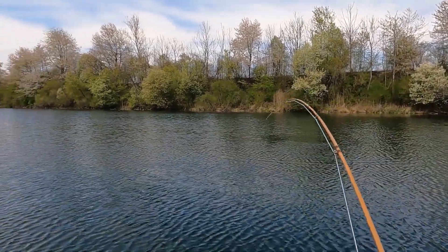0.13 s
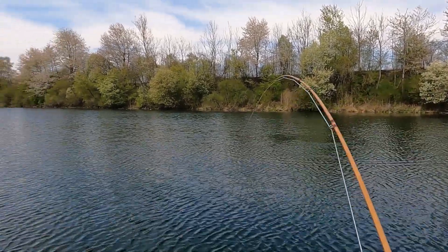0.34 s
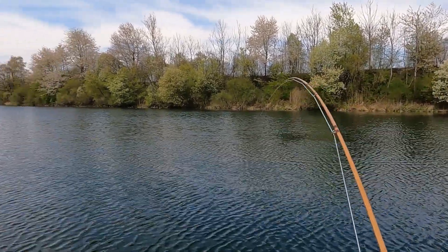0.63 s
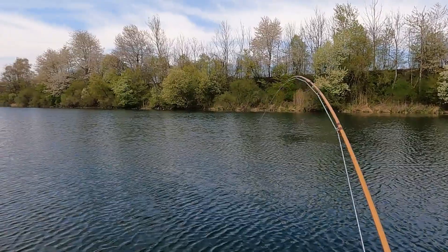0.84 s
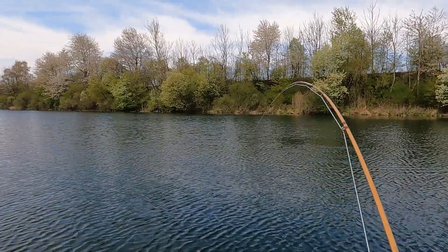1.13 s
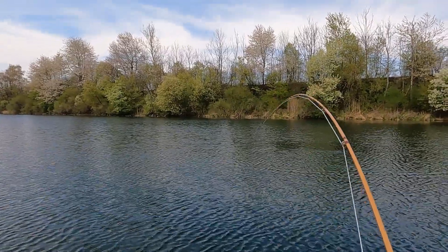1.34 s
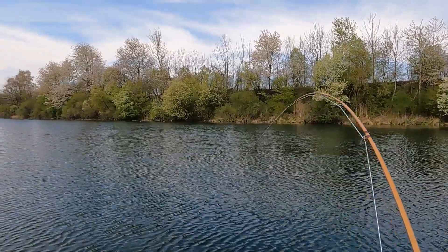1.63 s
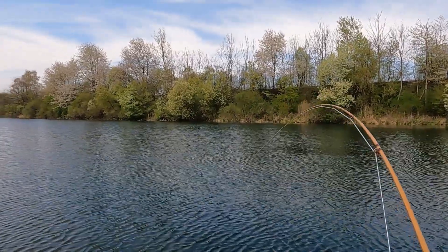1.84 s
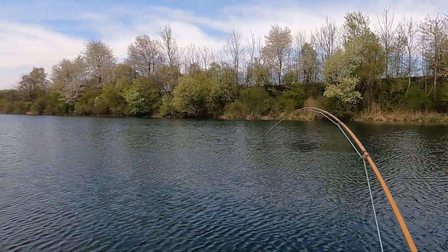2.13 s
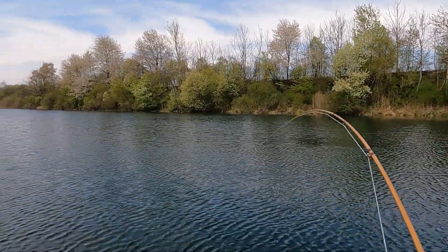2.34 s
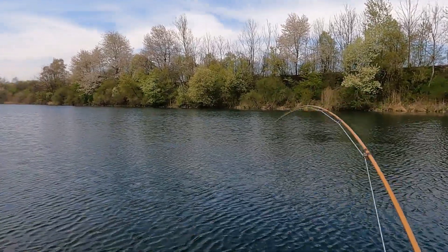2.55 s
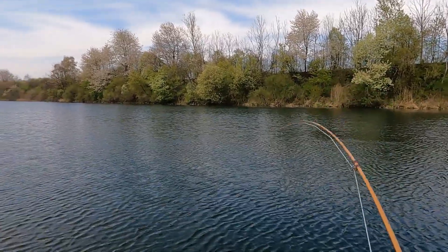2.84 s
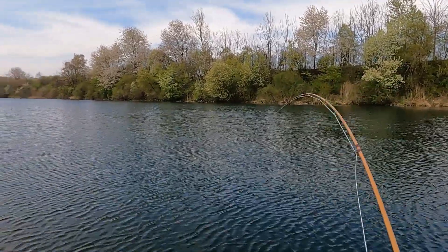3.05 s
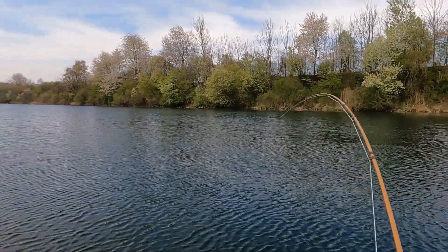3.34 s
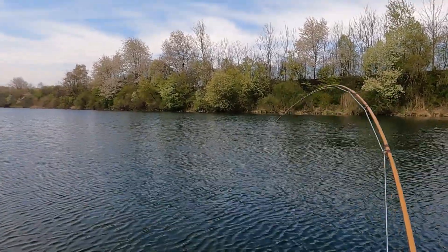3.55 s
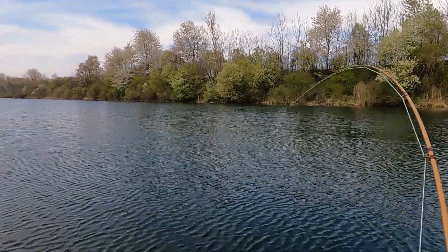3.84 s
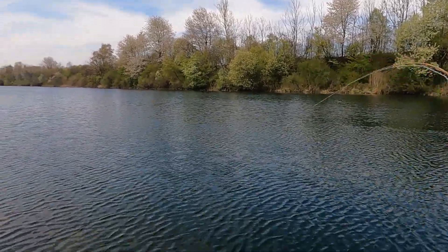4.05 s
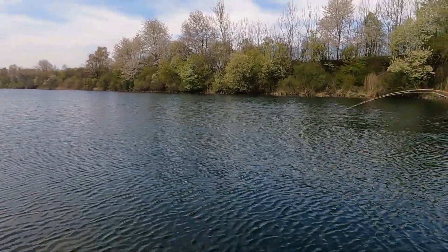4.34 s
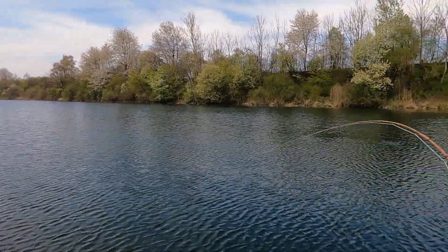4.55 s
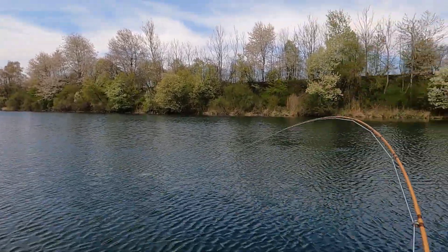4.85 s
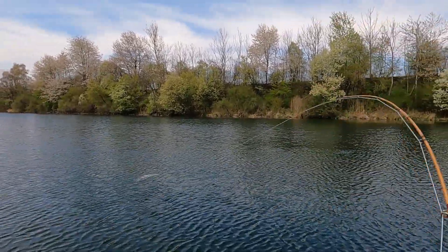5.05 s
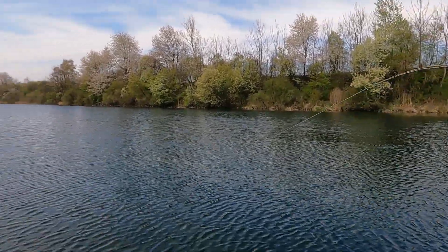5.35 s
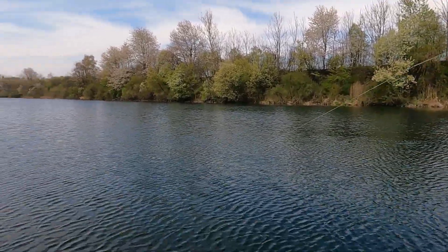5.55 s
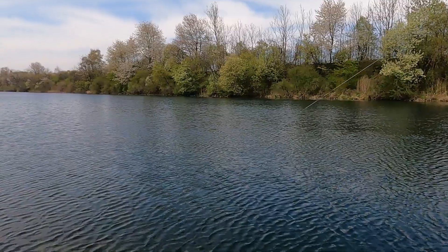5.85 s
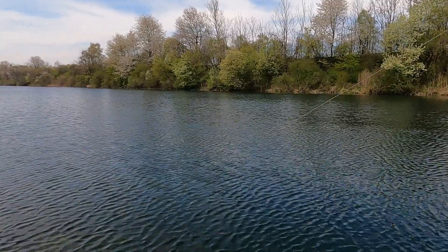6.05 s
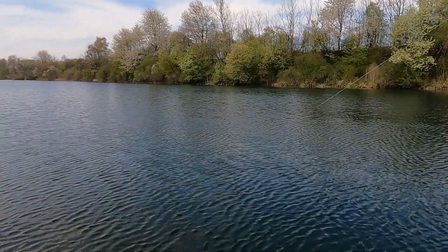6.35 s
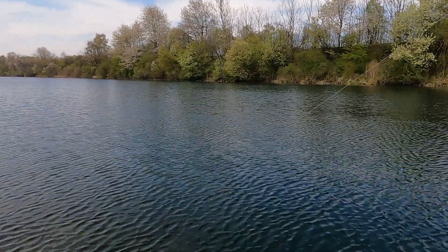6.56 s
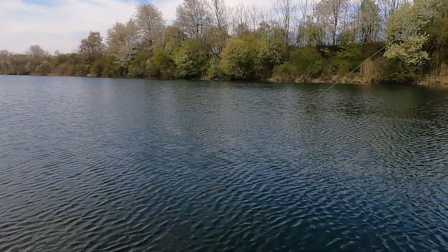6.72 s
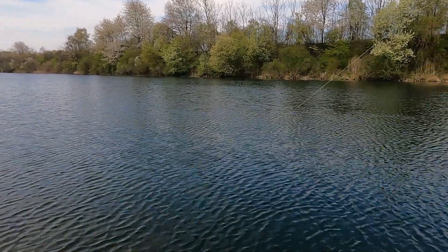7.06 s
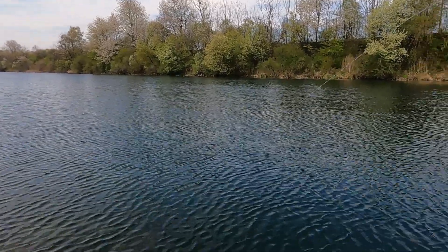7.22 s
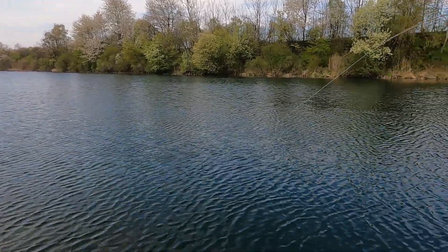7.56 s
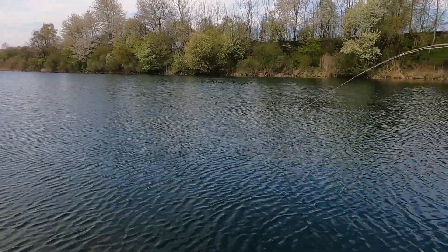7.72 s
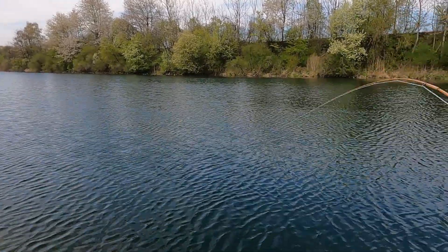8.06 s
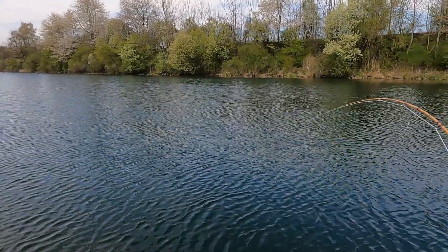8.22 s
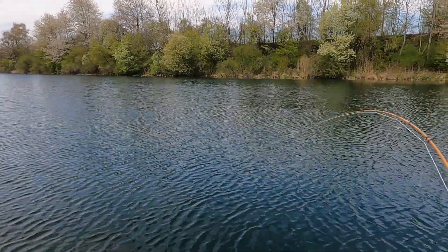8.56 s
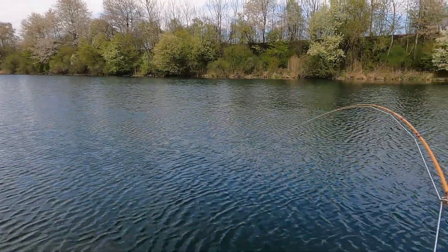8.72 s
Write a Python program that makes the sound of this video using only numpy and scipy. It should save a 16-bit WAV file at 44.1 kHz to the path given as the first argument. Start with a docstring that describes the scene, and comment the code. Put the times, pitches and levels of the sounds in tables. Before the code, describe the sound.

A close fly reel buzzes in two surging ratcheting runs, each followed by single clicks, with light wind rumbling on the microphone.

```python
"""A click-and-pawl fly reel buzzes close to the microphone: a fish is being played from a lake bank.
Its tugs spin the spool in two surging runs, each followed by single teeth. At every tooth the pawl
snaps and the metal frame rings; in the runs the colour cycles with each turn of the spool.
Light wind rumbles on the microphone and the open air murmurs far behind. A sleeve rustles as the rod
swings, and the line ticks on the rod and swishes through its rings."""
import sys
import numpy as np
from scipy import signal
from scipy.fft import rfft, irfft, next_fast_len
from scipy.io import wavfile
from scipy.ndimage import uniform_filter1d

SR = 44100
rng = np.random.default_rng(int(sys.argv[2]) if len(sys.argv) > 2 else 0)


def unload_audio(sound):
    """Save the sound as a 16-bit wav file, at the path given as the first command line argument."""
    columns = np.transpose(np.atleast_2d(sound))
    # keep every value between -1 and 1, then stretch to whole-number steps
    steps = np.round(np.clip(columns, -1, 1) * 32767)
    wavfile.write(sys.argv[1], SR, steps.astype(np.int16))


N = 392033
TIME = np.arange(N) / SR

# The pawl's dry snap, which changes with load and grip.
# Each row: frequency in Hz, then gain in dB for the first run, the second run and single teeth.
SNAP_SPECTRA = [(700.0, 4.5, 14.5, 6), (1455, 4, -4.5, 8.5), (2034, 33, 35.5, 33.5), (2733, 23, 26.5, 13),
                (3450, 34, 36, 20), (4190, 21, 15, 18.5), (5250, 22.5, 26, 11), (5910, 21.5, 22, 25.5),
                (8400, 17, 15.5, 20.5), (9100, 23, 17.5, 22.5), (9600, 14.5, 13.5, 18.5),
                (12320, 10.5, 14, 17), (13930, -0.5, 0, 1.5), (16000.0, -16, -20, -23)]
# Modes of frame and spool. Each row: frequency in Hz, seconds to fall 60 dB,
# then gain in dB for the first run, the second run and single teeth.
FRAME_MODES = [(1060, 0.015, -23.5, -13, -16), (1357, 0.017, -20.5, -38, -19), (2027, 0.012, 1, 3, -12),
               (2205, 0.0057, -32, -3.5, -25), (2580, 0.039, -14, -12.5, -14),
               (2644, 0.0041, 0.5, 4.5, -18.5), (2940, 0.014, -38, -32, -6.5),
               (3233, 0.054, -24, -13.5, -24.5), (3387, 0.034, -1, -43, -7.5), (3439, 0.022, 2.5, 6, 0.5),
               (3607, 0.053, -13.5, -10.5, -12), (3676, 0.012, -2, -27, 0), (3837, 0.016, -22.5, -6, -18),
               (4300, 0.025, -15.5, -10.5, -11.5), (4640, 0.067, -20.5, -15, -26.5),
               (4975, 0.014, -4.2, 1, -7), (5260, 0.0096, -5.5, -9, -18), (6530, 0.012, -50.5, -16, -20),
               (7580, 0.006, -31, 0, -21), (9020, 0.0076, -12, -24, -12.5), (11270, 0.017, -19, -11.5, -11),
               (12070, 0.014, -21, -15, -21), (12240, 0.02, -20.5, -21, -29)]
# The click's knock, bite, sheen and whine. Each row: low and high edge in Hz, once-a-turn swing in dB,
# its strongest tooth, twice-a-turn swing in dB, its strongest tooth, dB per doubling of speed.
CLICK_BANDS = [(1600, 2540, 1.5, 17, 3, 13.9, -1.5), (4620, 7350, 1.2, 32.6, 2.5, 5.8, 0),
               (8400, 12800, 2, 16.0, -0.2, 5.5, -2.4), (3120, 3750, 1.1, 29.4, 0.3, 3.3, 1.6)]
# The spool slipping one tooth at a time. Each row: start in seconds, then gain in dB for the snap,
# the spring's lowest note, its overtones, and the knock, bite and sheen bands.
SINGLE_TEETH = [(3.1773, -22.5, -61, -52, -13, -4, -1), (3.2212, -22.5, -55, -43, -9, -1.5, -10),
                (3.3636, -24.5, -49, -46, -5.5, 1.5, -1), (3.4884, -24.5, -55, -49, -7, -1, 3),
                (3.5992, -25.5, -35.5, -43, -4.5, -1.5, 4), (4.7155, -29, -39, -40, -2, -1.5, 5.5),
                (5.8518, -27, -45, -59, 0, 4.5, 3.5), (5.9864, -27, -49, -54, 1, 3, 5),
                (6.1396, -29.5, -60, -74, 6, 8, 2.5), (8.491, -25, -62, -65, -1.5, -1, 4),
                (8.6044, -27, -46, -40, -1, -1, 4), (8.6532, -22.5, -45, -37, -7, -11, 3),
                (8.6892, -23.5, -44, -46, -12, 0.5, 1), (8.7248, -22, -51, -37, -5, -1.5, -9)]


def from_db(db):
    """Decibels to gain."""
    return 10 ** (np.asarray(db) / 20)


def in_time(curve):
    """A curve of (seconds, value) rows at every sample."""
    return np.interp(TIME, *np.transpose(curve))


def at_hz(points, hz):
    """Read a spectrum on a log-frequency axis."""
    points = np.array(points)
    return np.interp(np.log(np.maximum(hz, 1)), np.log(points[:, 0]), points[:, 1])


def swell(centre, length):
    """A bell of height 1; its length in seconds spans four standard deviations."""
    bell = np.zeros(N)
    near = slice(*np.searchsorted(TIME, [centre - 2 * length, centre + 2 * length]))
    bell[near] = np.exp(-8 * ((TIME[near] - centre) / length) ** 2)
    return bell


def drift(per_s):
    """Random wandering of spread about 1, with so many new values a second."""
    knots = np.arange(0, N / SR + 1, 1 / per_s)
    return np.interp(TIME, knots, rng.standard_normal(len(knots)))


def clicks(times, heights):
    """Impulses at the given times."""
    train = np.zeros(N)
    np.add.at(train, np.clip(np.round(times * SR).astype(int), 0, N - 1), heights)
    return train


def ring(blows, hz, t60):
    """A unit impulse sets a sine of height 1 ringing; it falls 60 dB in t60 seconds."""
    decay, step = from_db(-60 / (t60 * SR)), 2 * np.pi * hz / SR
    return signal.lfilter([0, np.sin(step)], [1, -2 * decay * np.cos(step), decay ** 2], blows + 1e-18)


def filtered(x, hz, kind, order=2):
    """Butterworth low-, high- or band-pass."""
    return signal.sosfilt(signal.butter(order, hz, kind, fs=SR, output="sos"), x)


def colour(x, spectrum, size=512):
    """Causal (minimum-phase) filter with the given spectrum."""
    gain = from_db(at_hz(spectrum, np.fft.rfftfreq(size, 1 / SR)))
    cepstrum = irfft(np.log(gain))
    cepstrum[1:size // 2] *= 2
    cepstrum[size // 2 + 1:] = 0
    response = irfft(np.exp(rfft(cepstrum)))
    return signal.oaconvolve(x, response[None], axes=1)[:, :N]


def rms_one(x):
    """Scale to unit rms."""
    return x / np.sqrt(np.mean(x ** 2) + 1e-20)


def noise(spectrum):
    """Stereo noise of the given spectrum, less alike toward the treble; rms 1."""
    # Each row: frequency in Hz, correlation between left and right.
    likeness = [(30, 0.95), (120, 0.86), (300, 0.86), (1000, 0.79), (4000, 0.78), (14000, 0.66)]
    size = next_fast_len(N)
    hz = np.fft.rfftfreq(size, 1 / SR)
    mid, side = rfft(rng.standard_normal((2, size)))
    alike = at_hz(likeness, hz)
    both = np.sqrt(1 + alike) * mid + np.sqrt(1 - alike) * side * [[1], [-1]]
    shaped = both * from_db(at_hz(spectrum, hz)) * (hz > 12)
    return rms_one(irfft(shaped, size)[:, :N])


def tooth_times(start, stop, creep_teeth_per_s=15):
    """Each tug surges the spool and the pawl drops once per tooth: times and spool speeds."""
    # The fish's tugs. Each row: centre in seconds, added teeth per second, length in seconds.
    tugs = [(0.063, 65.5, 0.2035), (0.196, 50.6, 0.1214), (0.32, 54.8, 0.3306), (0.465, 48.0, 0.1304),
            (0.64, 70.9, 0.3352), (0.769, 52.2, 0.135), (0.864, 105.2, 0.1278), (1.029, 99.7, 0.1877),
            (1.166, 81.2, 0.1298), (1.279, 77.1, 0.1513), (1.392, 69.9, 0.1486), (1.551, 54.2, 0.2393),
            (1.761, 72.8, 0.3978), (2.032, 73.8, 0.2756), (2.179, 54.8, 0.1519), (2.302, 57.7, 0.3081),
            (2.452, 51.3, 0.16), (2.545, 69.5, 0.1389), (2.694, 59.8, 0.2384), (2.859, 75.0, 0.2844),
            (6.389, 55.1, 0.311), (6.48, 87.9, 0.1109), (6.642, 82.8, 0.2809), (6.778, 63.0, 0.113),
            (6.87, 109.9, 0.1559), (7.003, 75.9, 0.1971), (7.094, 39.4, 0.1097), (7.228, 112.7, 0.2109),
            (7.391, 69.4, 0.1605), (7.527, 77.9, 0.1524), (7.631, 92.4, 0.1415), (7.777, 35.9, 0.2414),
            (7.973, 51.9, 0.04), (8.03, 36.9, 0.04)]
    speed = creep_teeth_per_s + sum(added * swell(s, length) for s, added, length in tugs)
    turning = (TIME >= start) & (TIME <= stop)
    teeth_passed = np.cumsum(speed[turning]) / SR
    times = np.interp(np.arange(int(teeth_passed[-1]) + 1), teeth_passed, TIME[turning])
    return times, np.interp(times, TIME, speed)


def spin(span_s, db_per_doubling, start_tooth, teeth_per_turn=32, scatter_db=1.03):
    """One run: tooth times, levels that rise with speed, and band gains that cycle with each turn."""
    # The snap's force at middling speed. Each row: time in seconds, level in dB.
    snap_force = [(0, -28.5), (0.65, -29), (1.25, -28.5), (1.48, -29), (1.75, -28), (2.15, -28.5),
                  (2.33, -29), (2.6, -28.5), (2.98, -28.5), (6.3, -33.5), (6.5, -32.5), (6.85, -32.5),
                  (7.25, -31.5), (7.65, -32), (8.07, -31.5)]
    times, speed = tooth_times(*span_s)
    doublings = np.log2(speed / np.median(speed))
    level_db = np.interp(times, *np.transpose(snap_force)) + db_per_doubling * doublings
    tooth = start_tooth + np.arange(len(times))
    step = 2 * np.pi / teeth_per_turn
    bands_db = np.array([once_db * np.cos(step * (tooth - once_at))
                         + twice_db * np.cos(2 * step * (tooth - twice_at))
                         + speed_db * doublings
                         for _, _, once_db, once_at, twice_db, twice_at, speed_db in CLICK_BANDS])
    bands_db += scatter_db * rng.standard_normal((len(times), len(CLICK_BANDS))).T
    return times, level_db, bands_db


def chatter(times, force, rise_ms, fall_ms, tail_db, tail_ms=6.5, size=1500):
    """The rattle after a landing: a short burst of tiny contacts, new each time."""
    age_s = np.arange(size) / SR
    ms = 1000 * age_s
    decay = np.exp(-ms / fall_ms) + from_db(tail_db) * np.exp(-ms / tail_ms)
    bursts = rng.standard_normal((len(times), size)) * (1 - np.exp(-ms / rise_ms)) * decay
    bursts *= force[:, None] / np.linalg.norm(bursts, axis=1, keepdims=True)
    return clicks((times[:, None] + age_s).ravel(), bursts.ravel())


def changing_contact(x, times, bands_db):
    """Each band given in bands_db is stronger or weaker with the way the pawl meets that tooth."""
    latest_tooth = np.maximum(np.searchsorted(times, TIME + .001) - 1, 0)
    for (low, high, *_), db in zip(CLICK_BANDS, bands_db):
        gain = uniform_filter1d(from_db(db)[latest_tooth], size=40)
        x = x + (gain - 1) * filtered(x, [low, high], "band", order=1)
    return x


def microphone_ports(x, pan_db):
    """Two close ports hear the small, near reel with slightly different level and phase."""
    # Each row: frequency in Hz, radians by which the left port lags.
    left_lag = [(500, 0.6), (2400, 0.57), (3450, .85), (4400, 0.5), (8600, 0.31), (11200, 0.33),
                (14000, 1.2)]
    # Each row: frequency in Hz, left over right in dB, added to the pan.
    left_lean = [(1200, 1), (2400, -.3), (3450, -1), (5000, -0.66), (8200, 1.5), (14000, 1.5)]
    size = next_fast_len(N + 1024)
    hz = np.fft.rfftfreq(size, 1 / SR)
    left_over_right = from_db(pan_db + at_hz(left_lean, hz)) * np.exp(-1j * at_hz(left_lag, hz))
    half = np.sqrt(left_over_right)
    return irfft(rfft(x, size) * np.array([half, 1 / half]), size)[:, :N]


def ratchet(times, level_db, bands_db, column, rattle_db, seat_ms, pan_db, **rattle_shape):
    """At each tooth the pawl snaps, rattles and rings the frame; column picks the snap and mode gains."""
    force = from_db(level_db + rng.normal(0, 0.55, len(times)))
    seated = times + seat_ms / 1000
    mid, side = (chatter(times, force, **rattle_shape) for _ in range(2))
    # The finest rattle differs between the two ports.
    rattle = filtered(mid, 5500, "high") + from_db(-6) * filtered(side, 9500, "high") * [[1], [-1]]
    impact = filtered(clicks(seated, force), 5800, "low")
    spectrum = [(hz, gains_db[column]) for hz, *gains_db in SNAP_SPECTRA]
    snap = colour(impact + from_db(rattle_db) * rattle, spectrum)
    # No two teeth strike the modes quite alike.
    uneven = from_db(rng.normal(0, 1.38, (len(times), len(FRAME_MODES))))
    frame = np.zeros(N)
    for k, (hz, t60, *gains_db) in enumerate(FRAME_MODES):
        blows = clicks(seated, force * uneven[:, k] * from_db(gains_db[column]))
        frame += (-1) ** k * ring(blows, hz, t60)
    radiated = filtered(snap + frame, 540, "high")   # the small reel radiates little bass
    return microphone_ports(changing_contact(radiated, times, bands_db), pan_db)


def reel_runs():
    """Right by the microphone, the fish takes line twice and the clicks crowd into a buzz."""
    first_teeth = spin(span_s=(0.002, 2.978), db_per_doubling=1.8, start_tooth=0.1)
    first = ratchet(*first_teeth, column=0, rattle_db=2.2, seat_ms=.4, pan_db=-0.15,
                    rise_ms=0.98, fall_ms=0.94, tail_db=-21)
    second_teeth = spin(span_s=(6.301, 8.078), db_per_doubling=1.5, start_tooth=1.6)
    second = ratchet(*second_teeth, column=1, rattle_db=4.0, seat_ms=.35, pan_db=1.1,
                     rise_ms=1.0, fall_ms=0.79, tail_db=-21.5)
    return first + second


def wind(breeze_gain_db, slap_db=-1, slap_hz=37.2, slap_s=0.037):
    """Turbulence on the ports swells and slaps with each gust; strong gusts load the right port more."""
    # Each row: frequency in Hz, relative spectral density in dB.
    rumble_spectrum = [(15, -0.5), (32, 2), (55, -2.5), (75, -8), (110, -12.5), (170, -22.5), (260, -33),
                       (500, -48), (1500, -79)]
    # The steady breeze. Each row: time in seconds, level in dB before its gain.
    breeze = [(0.0, -40.5), (0.44, -47.5), (1.31, -41), (1.78, -47.5), (2.4, -45.5), (6.83, -57.5),
              (7.25, -47), (8.37, -46.5), (8.72, -33), (8.89, -36)]
    # Each row: centre in seconds, level there in dB, length in seconds.
    gusts = [(0.963, -35.5, 0.25), (1.179, -32.5, 0.12), (1.491, -38, 0.11), (1.977, -35, 0.05),
             (2.337, -36, 0.18), (2.504, -32.5, 0.16), (2.998, -36, 0.075), (3.562, -42, 0.16),
             (4.058, -46, 0.11), (4.963, -44.5, 0.23), (7.207, -39.5, 0.16), (7.503, -43, .08),
             (7.869, -42, 0.22), (8.59, -20, 0.079), (8.78, -39.5, 0.23)]
    power = from_db(in_time(breeze) + breeze_gain_db) ** 2
    power += sum((from_db(db) * swell(s, length)) ** 2 for s, db, length in gusts)
    # A pressure pulse at the heart of each gust.
    slaps = sum(from_db(db + slap_db) * swell(s, slap_s) * np.cos(2 * np.pi * slap_hz * (TIME - s))
                for s, db, _ in gusts)
    lean_db = np.interp(10 * np.log10(power), [-44, -30], [1.5, 7])
    return (np.sqrt(power) * noise(rumble_spectrum) + slaps) * from_db(lean_db * [[-.5], [.5]])


def open_air(drone_gain_db, murmur_gain_db):
    """Around the lake, a low drone comes and goes over a broad, far murmur."""
    # Each row: frequency in Hz, relative spectral density in dB.
    drone_spectrum = [(100, -19), (200, -6), (260, -7), (305, 4.5), (340, -3), (385, -5.5), (600, -15.5),
                      (1200, -48.5)]
    murmur_spectrum = [(60, 1), (130, 9.5), (220, 4.5), (400, -2), (700, -2), (1100, -2), (1600, -6.5),
                       (2400, -17.5), (4000, -22.5), (7500, -24.5), (9000, -34), (13000, -38), (16000, -69)]
    # Each row: time in seconds, level in dB before the gain.
    drone_level = [(0.0, -59), (0.15, -50.5), (0.69, -67.5), (1.41, -68), (1.66, -55.5), (2.05, -74),
                   (2.28, -52), (3.02, -72), (3.71, -75), (4.11, -56), (4.21, -66), (6.41, -64.5),
                   (6.54, -55.5), (7.13, -70), (7.62, -59.5), (7.72, -74), (7.97, -58.5), (8.89, -79)]
    murmur_level = [(0.0, -59.5), (0.47, -62.5), (2.4, -63), (3.46, -65.5), (3.96, -59.5), (5.05, -64.5),
                    (5.64, -62.5), (8.89, -63.5)]
    drone = from_db(in_time(drone_level) + drone_gain_db) * noise(drone_spectrum)
    murmur = from_db(in_time(murmur_level) + murmur_gain_db) * noise(murmur_spectrum)
    return drone + murmur


def sleeve(grit_db=2.5):
    """The sleeve rubs on the jacket as the rod swings, gritty as the fibres catch."""
    # Each row: frequency in Hz, relative spectral density in dB.
    cloth_spectrum = [(150, -20), (400, -5), (1200, 1.5), (1900, 0), (2800, -6.5), (4800, -7),
                      (7500, -15.5), (9500, -24.5), (12500, -28.5), (16000, -44)]
    # Each row: crest in seconds, level there in dB, seconds to rise 20 dB, seconds to fall 20 dB.
    rubs = [(1.65, -51, 0.89, 1.1), (3.93, -49.5, .34, 0.69), (5.8, -53, 0.62, 1.03), (6.6, -54, .8, 1.7),
            (8.8, -60, 0.19, 0.074)]
    rubs_db = [db - 20 * np.maximum((s - TIME) / rise, (TIME - s) / fall) for s, db, rise, fall in rubs]
    return from_db(np.max(rubs_db, axis=0) + grit_db * drift(per_s=250)) * noise(cloth_spectrum)


def single_teeth():
    """After each run the pawl drops over a few teeth, every click heard on its own."""
    times, level_db, _, _, *bands_db = np.transpose(SINGLE_TEETH)
    return ratchet(times, level_db, bands_db, column=2, rattle_db=1.36, seat_ms=.15, pan_db=1.0,
                   rise_ms=0.28, fall_ms=1.0, tail_db=-26)


def pawl_spring():
    """Left free after a single tooth, the pawl's spring sings on."""
    # Each row: frequency in Hz, relative level in dB, seconds to fall 60 dB.
    overtones = [(7660, 0, .08), (11400, -13, .08), (12550, -14, .08)]
    times, _, note_db, overtone_db, *_ = np.transpose(SINGLE_TEETH)
    note = ring(clicks(times, from_db(note_db)), hz=3793, t60=0.17)
    return note + sum(ring(clicks(times, from_db(overtone_db + db)), hz, t60) for hz, db, t60 in overtones)


def line_ticks():
    """Taut line shifts on the rod with brief, soft ticks."""
    # Each row: start in seconds, relative level in dB.
    ticks = [(3.795, -38), (5.107, -41), (5.232, -47), (8.215, -49)]
    times, level_db = np.transpose(ticks)
    slips = chatter(times, from_db(level_db + 13), rise_ms=.6, fall_ms=3.0, tail_db=-18, tail_ms=6.0)
    return filtered(filtered(slips, 3200, "high"), 4700, "low")


def line_swishes(half_width=0.076):
    """Line slides through the rod rings: each swish is soft friction noise in one narrow band."""
    # Each row: centre in seconds, level there in dB, band centre in Hz, length in seconds.
    swishes = [(8.22, -71, 5000, 0.14), (8.367, -73, 5100, 0.11), (8.79, -62.5, 2180, 0.24)]
    friction = rng.standard_normal(N)
    edges = np.array([1 - half_width, 1 + half_width])
    return sum(from_db(db) * swell(s, length) * rms_one(filtered(friction, hz * edges, "band"))
               for s, db, hz, length in swishes)


def scene():
    """From the bank: reel and line up close; wind, sleeve and open air around them."""
    tackle = reel_runs() + single_teeth() + pawl_spring() + line_ticks() + line_swishes()
    return tackle + wind(breeze_gain_db=2.5) + sleeve() + open_air(drone_gain_db=1.0, murmur_gain_db=6.5)


def record(dry):
    """The top is cut steeply, 60 dB down from 16.4 kHz."""
    return signal.sosfilt(signal.cheby2(14, 60, 16400, fs=SR, output="sos"), dry)


dry = scene()
out = record(dry)
unload_audio(out)
```